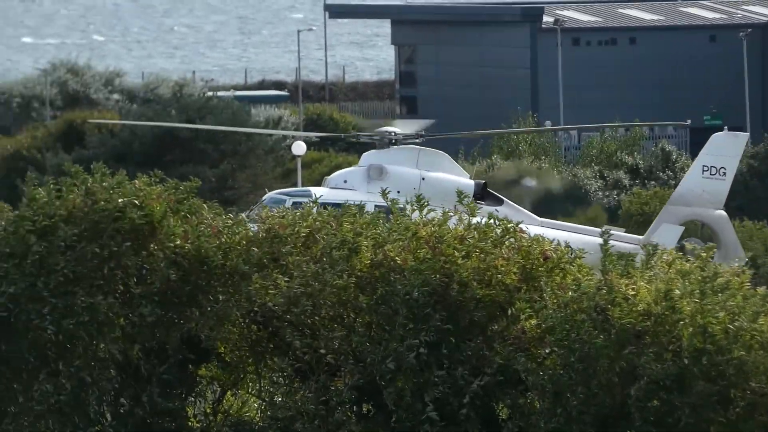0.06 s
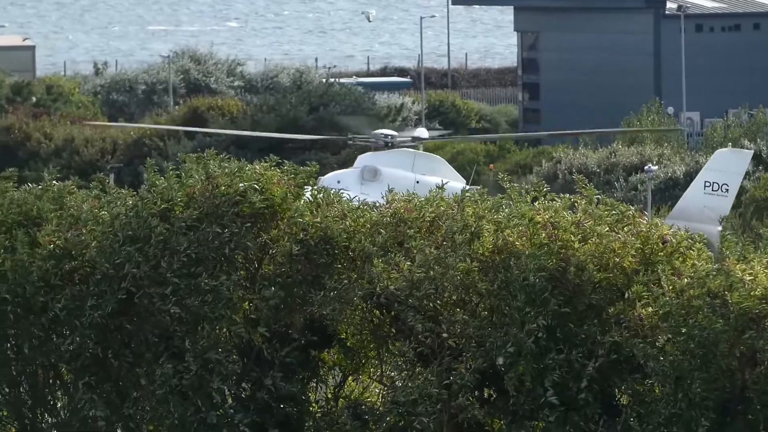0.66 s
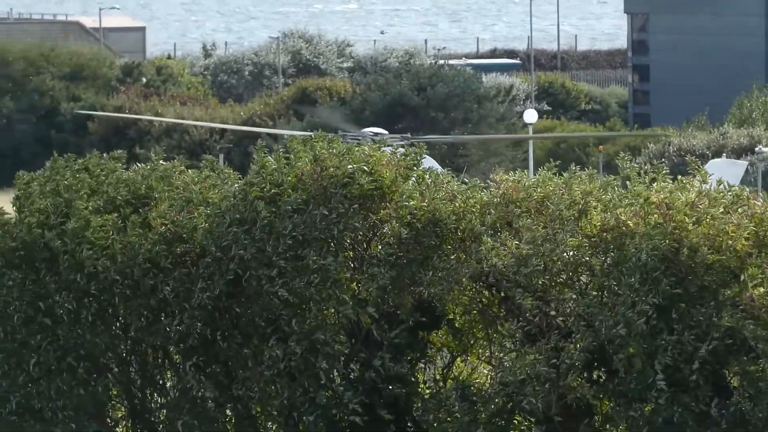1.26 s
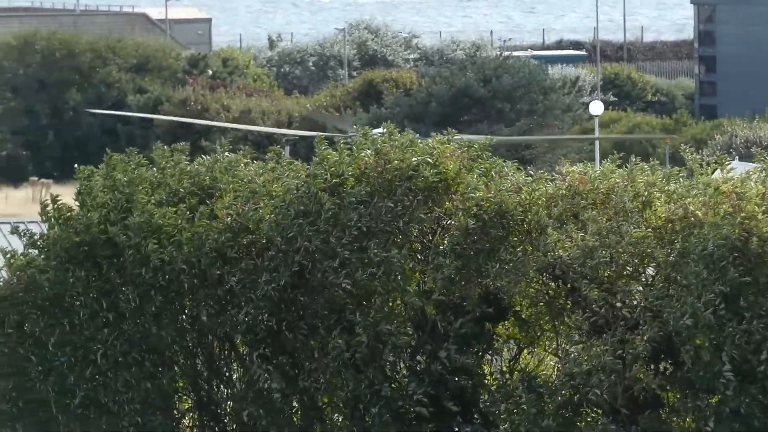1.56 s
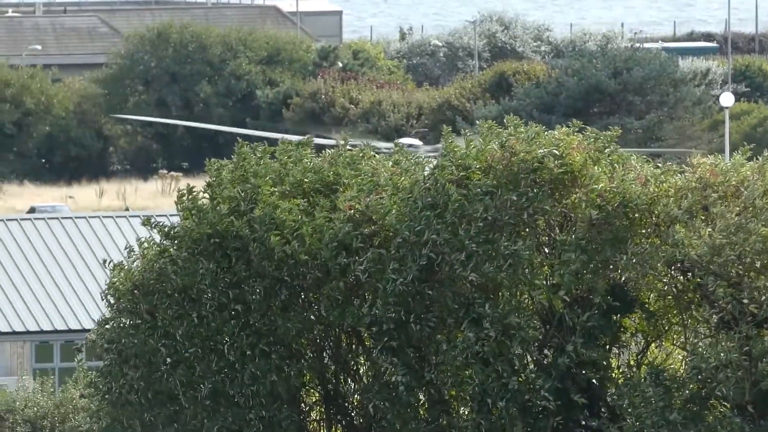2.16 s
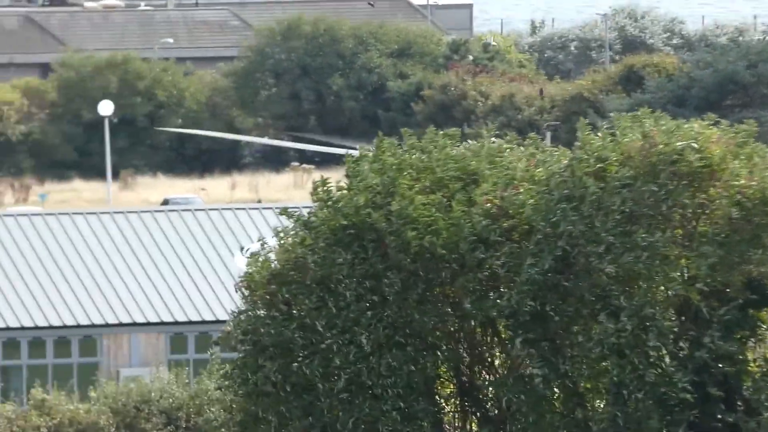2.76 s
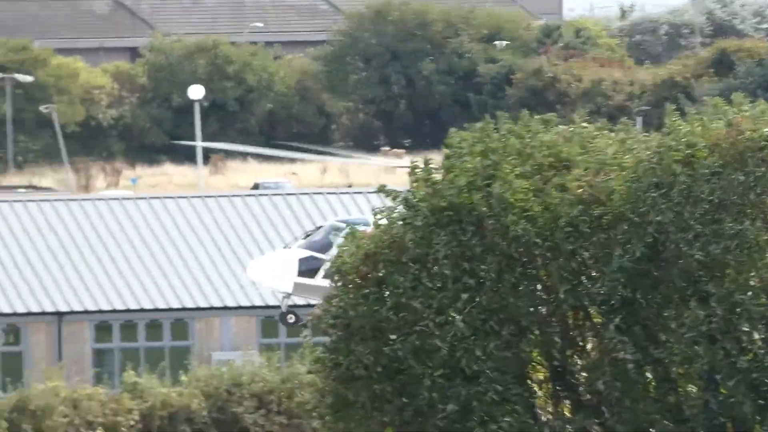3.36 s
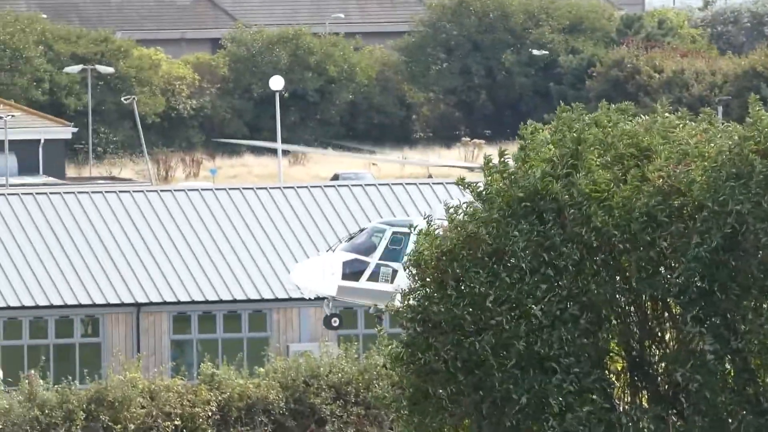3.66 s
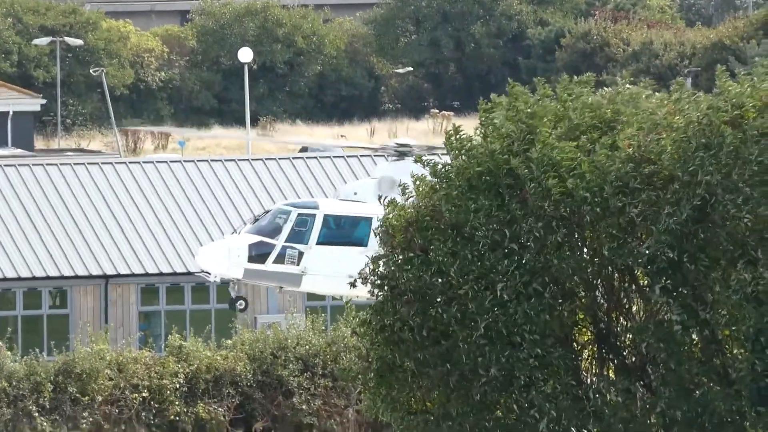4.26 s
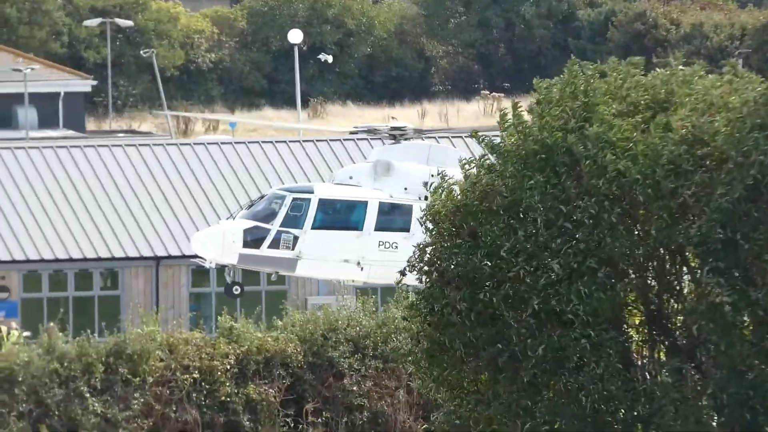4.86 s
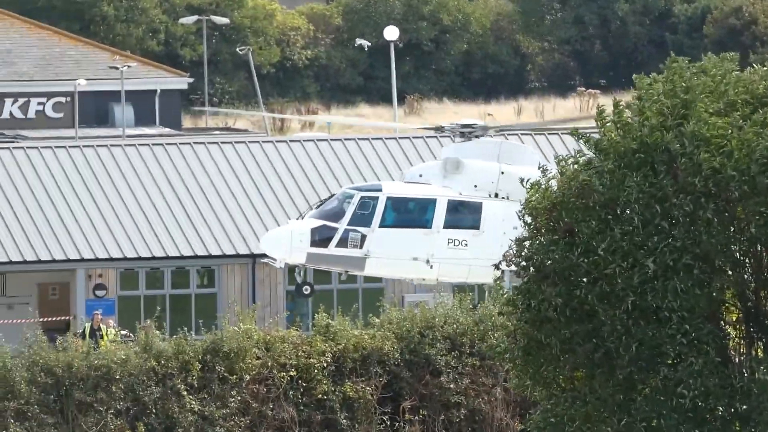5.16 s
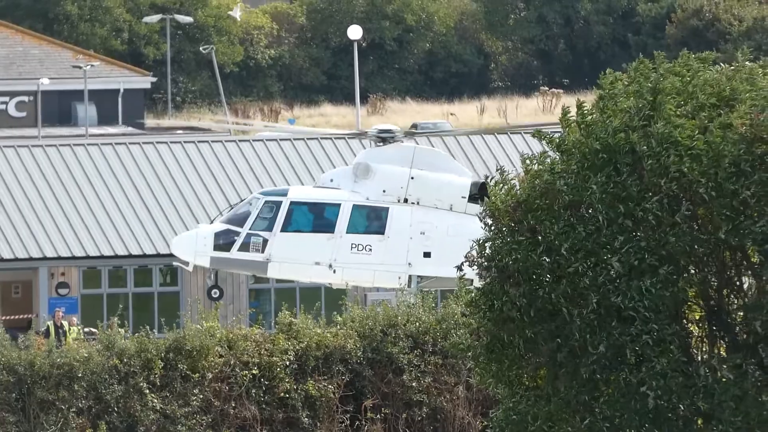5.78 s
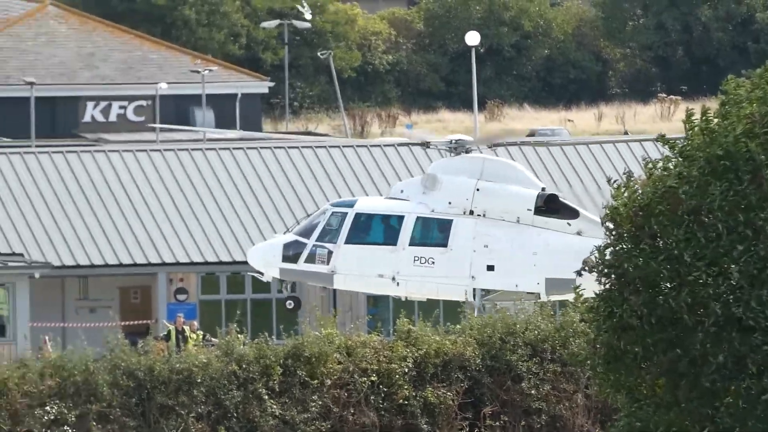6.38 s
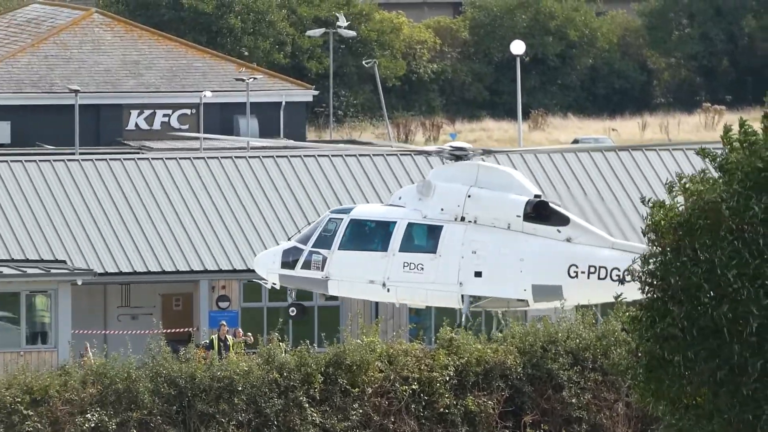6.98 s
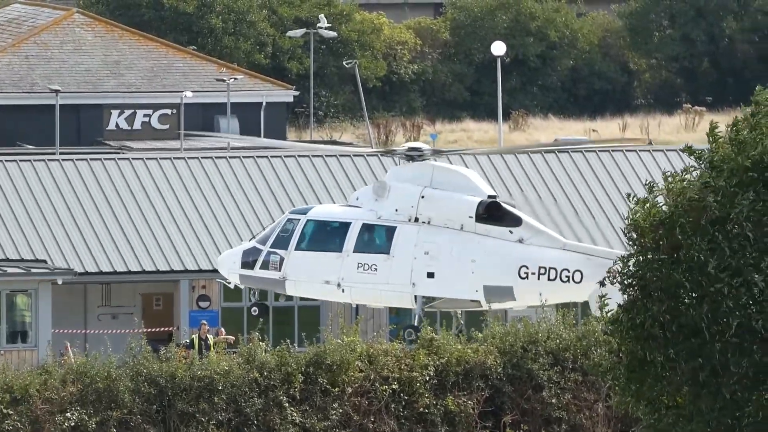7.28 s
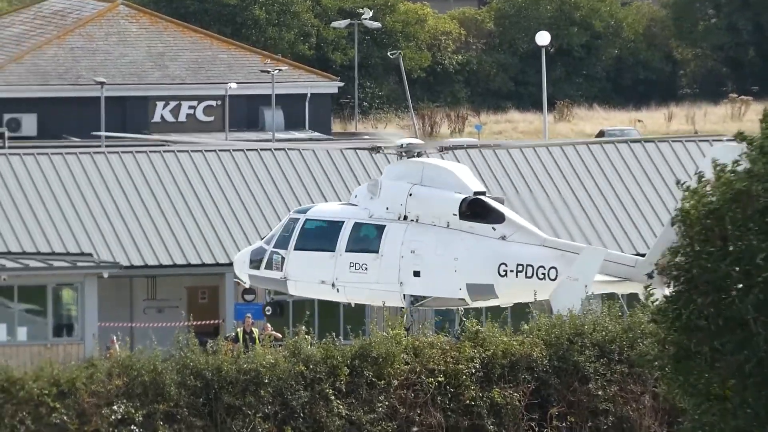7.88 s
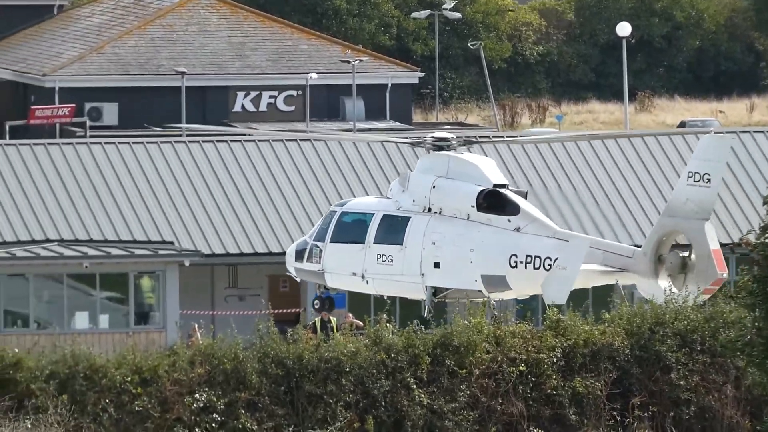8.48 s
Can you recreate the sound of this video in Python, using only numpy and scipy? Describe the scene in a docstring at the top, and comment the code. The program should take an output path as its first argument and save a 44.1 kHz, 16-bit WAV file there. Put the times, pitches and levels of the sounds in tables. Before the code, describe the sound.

A helicopter hovers low some way off outdoors, its rotor making a steady, throbbing rush with exhaust hiss and thin engine tones. Quick blade slaps build and are loudest in the first half, then the sound sinks to a softer hiss before swelling again with lighter slaps. Gusts flutter and thump on the microphone throughout, and a small bird whistles faintly early on.

```python
"""Helicopter behind a hedge

A twin-turbine helicopter hover-taxis some way off on a breezy day. Its rotor roar throbs at the blade
rate and sharpens into slaps where blades cut their own wake; tail fan, gearbox and turbines add thin
tones. Gusts buffet the microphone, leaves rustle and a small bird whistles over a distant rumble."""
import sys
import numpy as np
from scipy import signal
from scipy.fft import rfft, irfft, next_fast_len
from scipy.io import wavfile
from scipy.ndimage import map_coordinates

SR = 44100
rng = np.random.default_rng(int(sys.argv[2]) if len(sys.argv) > 2 else 0)


def wrap_up_sound(samples):
    """Save the sound to the file named by the first command line argument, as 16-bit audio."""
    columns = np.atleast_2d(samples).T
    # keep every value between -1 and 1, then stretch to whole-number steps
    tamed = np.clip(columns, -1, 1)
    steps = np.round(tamed * 32767).astype(np.int16)
    wavfile.write(sys.argv[1], SR, steps)


N = 376173
TIME = np.arange(N) / SR
FFT_SIZE = next_fast_len(N, real=True)
FREQS = np.maximum(np.arange(FFT_SIZE // 2 + 1) * SR / FFT_SIZE, 1)

# mix of blade rush, wake roar and exhaust hiss: time_s, rush_db, roar_over_rush_db, hiss_over_rush_db
ROTOR_MIX = [(0, -37, -0.5, -7), (.15, -33, 0.5, -7), (.3, -28, -7.5, -12.5), (.4, -37, -2.5, -12.5),
             (.53, -39, -7, -9), (.68, -32.5, 0, -11.5), (.8, -37.5, 2.5, -10), (1.38, -32, 5.5, -11.5),
             (1.55, -39.5, 4.5, -10), (1.74, -33.5, 3, -15), (1.87, -33.5, 4, -14), (2.0, -32.5, 7.5, -12),
             (2.32, -29.5, 3.5, -13.5), (2.62, -31, 5.5, -12), (2.8, -29, 6.5, -11.5),
             (2.94, -25.5, 1, -17), (3.26, -30.5, 0.5, -12), (3.48, -23, -2, -19), (3.65, -34.5, -4, -14),
             (3.82, -31.5, -10.5, -15.5), (4.18, -42, -2, -5), (4.48, -34, -1, -8), (4.75, -47.5, -12, -7),
             (4.88, -39, -7, -6.5), (5.03, -48.5, -8, -4.5), (5.36, -56.5, 5, -6.5),
             (5.78, -51, -8.5, -4.5), (5.95, -44.5, -7, -5.5), (6.27, -42, -1, -5), (6.4, -36.5, -2.5, -9),
             (6.52, -35.5, -7.5, -11.5), (6.93, -39, -5, -7.5), (7.16, -36, -3, -8),
             (7.68, -41.5, -2.5, -2.5), (7.9, -30, -8, -4.5), (8.02, -34, -4, -5.5),
             (8.26, -38.5, -7.5, -3.5), (8.42, -36.5, 0, -6), (8.53, -36, 1.5, -4)]
# rotor speed, rising a little as the pilot pulls up: time_s, blades_per_s
BLADE_RATE = [(0, 23.53), (4.55, 23.53), (6.0, 24.0), (8.53, 24.05)]
# how much of the rotor's power comes in pulses: time_s, share_0_to_1
CHOP = [(0, .08), (.55, .1), (.85, .42), (1.15, .42), (1.4, .28), (1.75, .05), (2.1, .2), (2.4, .3),
        (2.75, .25), (3.1, .08), (4.6, .05), (5.6, .08), (6.0, .22), (6.25, .1), (6.65, .04), (6.85, .24),
        (7.1, .22), (7.25, .05)]
# the ground swallows the roar below this edge: time_s, edge_hz
GROUND_EDGE = [(0, 686), (1.7, 797), (2.2, 734), (2.7, 460), (3.0, 487), (3.5, 630), (4.4, 634), (6.7, 820),
               (8.53, 637.4)]
# the rush brightens and dulls as the rotor tilts: time_s, centre_hz
RUSH_CENTRE = [(0, 1806), (.3, 1799), (1.4, 1645), (2.0, 1772), (3.5, 1674), (4.8, 1726), (6.0, 1624),
               (7.3, 1540), (7.75, 1682), (7.9, 1903), (8.05, 1684), (8.53, 1650)]
# the hiss turns hollow as the helicopter clears the hedge: time_s, depth_0_to_1
HOLLOW_DEPTH = [(4.8, 0), (5.5, 0.5), (7.3, 0.7), (8.53, 0.26)]
# blade slaps, before ground and air filter them: start_s, level_db, centre_hz, rise_s
SLAPS = [(.707, -21, 1400, .0009), (.792, -23, 1050, .0012), (.916, -21, 950, .0009),
         (1.044, -18, 1020, .0012), (1.1295, -14.5, 1050, .0009), (1.173, -18, 1000, .001),
         (1.298, -17, 1000, .0009), (1.342, -18.5, 880, .0008), (1.350, -14.5, 900, .0009),
         (1.425, -15.5, 950, .0009), (2.148, -14, 900, .0008), (2.194, -16, 1200, .001),
         (2.279, -12.5, 1300, .0013), (2.321, -11.5, 1100, .0013), (2.363, -13, 1500, .0011),
         (2.406, -8.5, 1400, .0012), (2.449, -9.5, 980, .0009), (2.4895, -3.5, 920, .0007),
         (2.5325, -5, 950, .0006), (2.790, -14, 900, .0009), (2.833, -13.5, 850, .0009),
         (2.876, -16, 900, .0009), (2.930, -14.5, 900, .0009), (2.960, -14, 1100, .0009),
         (3.170, -12.5, 940, .0006), (3.256, -12, 900, .0006), (3.558, -18, 1000, .0007),
         (4.891, -30, 1700, .0006), (5.131, -26, 1900, .0005), (5.9195, -26.5, 1550, .0007),
         (5.961, -28, 1550, .0006), (6.0025, -26, 1650, .0006), (6.044, -24.5, 1650, .0006),
         (6.087, -29, 1600, .0004), (6.128, -31, 1550, .0007), (6.212, -29.5, 1300, .0009),
         (6.257, -29.5, 1200, .0007), (6.379, -24.5, 1300, .0005), (6.421, -27, 1050, .0006),
         (6.797, -24, 1600, .0004), (6.8375, -20.5, 1500, .0005), (6.879, -23.5, 1650, .0008),
         (6.960, -28, 1600, .0007), (7.001, -21.5, 1500, .0005), (7.0425, -20.5, 1500, .0004),
         (7.053, -24.5, 1600, .0006), (7.083, -20.5, 1700, .0004), (7.283, -26, 950, .0014),
         (7.323, -25, 950, .0014), (7.361, -22.5, 850, .0012)]
# tail fan tone: time_s, level_db
FAN_LEVEL = [(0, -47), (1.0, -58), (1.7, -58), (2.7, -45), (3.6, -59), (4.8, -59), (5.7, -89), (7.7, -50.5),
             (7.95, -37), (8.22, -47), (8.53, -38)]
# gearbox tones: time_s, low_mesh_db, high_mesh_db
GEAR_LEVELS = [(0, -54, -57), (1.3, -60.5, -56), (2.1, -55.5, -52), (2.7, -35, -46), (3.2, -45, -47),
               (3.7, -70, -52), (5.0, -84, -67), (7.0, -59, -55), (7.6, -56, -52), (7.93, -45.5, -36.5),
               (8.23, -60, -50), (8.53, -51, -38)]
# rough engine hum: time_s, level_db
HUM_LEVEL = [(0, -33), (.3, -47), (.6, -63), (1.3, -37), (1.7, -46.5), (2.1, -33), (2.75, -31), (3.2, -37),
             (3.7, -45), (4.8, -63)]
# compressor whine, second turbine tone and an airy engine band that fades: time_s, pitch_hz, level_db
WHINE = [(0, 10375, -94), (1.0, 10400, -82), (2.2, 10340, -89), (2.9, 10410, -77), (3.7, 10430, -83),
         (4.4, 10670, -79), (5.0, 10720, -84), (5.4, 10660, -93), (6.5, 10630, -83), (7.4, 10530, -82),
         (8.53, 10480, -78)]
WHISTLE = [(0, 8700, -92), (1.0, 8800, -76), (2.8, 8740, -78.5), (3.6, 8850, -79), (5.0, 8800, -101),
           (8.53, 8748, -81)]
SOUGH = [(0, 2246, -41), (.3, 2260, -48), (.6, 2260, -55), (1.2, 2315, -68)]
# gusts on the microphone: start_s, length_s, flutter_db, rumble_over_flutter_db, left_over_right_db
GUSTS = [(0, 0.29, -46, -8, 5.5), (0.283, 0.34, -43.5, -12.5, 2.5), (0.725, 0.09, -40, -16.0, -1.0),
         (0.82, 0.11, -46.5, -9, -1), (0.923, 0.11, -42.0, -6.5, -1.5), (1.06, 0.14, -48.5, -7, 4),
         (1.376, 0.06, -50, -8, 3), (1.451, 0.066, -48, 4, 3), (1.55, 0.081, -49, -5.5, 3),
         (1.68, 0.48, -54.5, -6.5, 4), (2.385, 0.34, -56.5, 0.5, 2), (2.767, 0.2, -49.5, -4, 0.0),
         (2.962, 0.07, -47.5, -2, 1.0), (3.056, 0.12, -49.5, -1, 4), (3.194, 0.058, -44.5, -2, -2),
         (3.28, 0.13, -45.5, -3.5, -3), (3.458, 0.17, -46.5, 3, 4), (3.623, 0.19, -47, -6.5, 4),
         (3.848, 0.14, -44, -8.5, 5), (4.027, 0.061, -39.5, -27.0, -6), (4.126, 0.034, -40.5, -21.0, -6),
         (4.334, 0.18, -48.5, -1, 4), (4.54, 0.11, -46.5, -4, 7), (4.695, 0.058, -45.5, -7, 8),
         (4.965, 0.16, -41.5, -10.5, 7), (5.154, 0.21, -41, -13, 4.5), (5.367, 0.29, -42.5, -12.5, -0.5),
         (5.668, 0.11, -41.5, -7.0, -4), (5.786, 0.28, -49, -1.5, -0.5), (6.05, 0.22, -47.5, -4.5, -1),
         (6.354, 0.21, -51, -1, 6), (6.592, 0.2, -46.5, -6, 5.5), (6.834, 0.12, -43, -15, 4.0),
         (7.098, 0.033, -45.0, -14, -1.5), (7.177, 0.11, -44.5, -6, 1), (7.33, 0.325, -40, -18, 2.0),
         (7.674, 0.06, -51, -11.5, 2.5), (7.777, 0.11, -41.5, -15, 1.5), (7.912, 0.083, -42.5, -6, 5),
         (8.039, 0.23, -42, -13, 3), (8.29, 0.13, -46.5, -12, 2), (8.474, 0.06, -49, -2, 1.5)]
# how much the two microphone ports differ in wind: frequency_hz, side_over_mid_db
WIND_WIDTH = [(50, -20), (170, -22), (300, -12.5), (500, -7.5), (800, -2), (2000, 16.5)]
# single eddies on the microphone: start_s, level_db, centre_hz, rise_s, left_over_right_db
THUMPS = [(.722, -29.5, 380, .009, -1), (2.98, -31, 300, .004, 5), (3.173, -31, 380, .004, 0),
          (4.62, -33, 380, .004, 5), (4.672, -26.5, 520, .005, 5), (4.956, -29, 420, .004, 6),
          (5.325, -30, 400, .003, 3), (5.627, -30, 400, .002, -2), (6.733, -33, 370, .003, 3),
          (8.092, -32, 380, .003, 3), (8.25, -27.5, 400, .003, 4)]
# leaves shaken close by: centre_s, half_length_s, level_db
RUSTLES = [(1.842, .05, -67), (2.852, 0.25, -71.5), (3.241, 0.1, -68), (3.44, 0.062, -63),
           (4.304, 0.33, -75), (6.143, .016, -64), (6.303, .012, -65)]
# a small bird's whistles: start_s, length_s, from_hz, to_hz, half_peak_db
BIRD_NOTES = [(1.47, .07, 3040, 3340, -51.5), (1.55, .14, 3870, 3970, -57), (1.98, .14, 3060, 3380, -50.5),
              (2.06, .09, 4200, 4420, -55)]
# tone colours of the rotor, wind, hedge and background noises: frequency_hz, relative_db
ROAR_EQ = [(300, -26.5), (480, -9), (620, -5), (760, 7), (870, 9.5), (1020, 5.5), (1180, -3.5), (1500, 3),
           (2500, -28)]
RUSH_EQ = [(500, -51), (850, -14.5), (1200, -6.5), (1400, -2), (1700, 1.5), (1950, -2), (2150, -3),
           (2450, -8.5), (2800, -13.5), (3500, -24), (5000, -47.5)]
HISS_EQ = [(1800, -4), (2600, 1.5), (3100, 0), (4250, -2.5), (4750, -8), (5200, -9), (6000, -15),
           (7400, -22.5), (7950, -31), (8800, -28.5), (10500, -36.5), (11300, -53.5), (15000, -59)]
FLUTTER_EQ = [(100, -43), (200, -16), (310, 1), (450, 4.5), (600, -1), (780, -3.5), (1100, -15),
              (1800, -38.5), (3000, -62), (6000, -66.5)]
RUMBLE_EQ = [(30, -37.5), (55, -38), (78, -29.5), (100, -14.5), (140, -3), (200, 2.5), (260, 2), (360, -8),
             (600, -36.5)]
LEAVES_EQ = [(500, -28), (2500, 3.5), (4000, -8), (6000, -3), (8000, -16), (10500, -11.5), (11500, -23),
             (15000, -25.5)]
RUSTLE_EQ = [(4000, -21), (9500, 6), (11500, -2), (15000, -16)]
SURROUNDINGS_EQ = [(20, -20), (45, -25), (70, -14), (110, -3), (160, -1.5), (400, -1), (1000, -14)]


def rotor(hiss_chop=.43, grit_db=1.05, shimmer_db=1.5):
    """Wake roar, blade rush and exhaust hiss, throbbing with the blades."""
    rush_db, roar_db, hiss_db = automation(ROTOR_MIX)
    chop, = automation(CHOP)
    throb = np.sqrt(1 - chop + chop * blade_pulses())
    throb *= unit_rms(from_db(grit_db * drift(100)))  # eddies cut by the blades crackle
    blades = throb * (from_db(roar_db) * wake_roar() + blade_rush())
    exhaust = from_db(hiss_db) * exhaust_hiss() * (1 + hiss_chop * (throb - 1))
    mix = from_db(rush_db) * (blades + exhaust)
    # turbulent air on the way makes each band shimmer on its own
    return moving_eq(mix, 600, 8000, lambda hz: shimmer_db * drift(5), bands=10)


def blade_pulses(sharpness=3.0, uneven_db=.8, jitter=.015, first_blade_s=.027):
    """One swell of power per passing blade, each with its own strength; mean 1."""
    rate, = automation(BLADE_RATE)
    passed = np.cumsum(rate) / SR - first_blade_s * rate[0] + jitter * drift(19)
    blade = np.floor(passed + .5).astype(int)
    strength = from_db(uneven_db * rng.standard_normal(blade.max() + 2))[blade + 1]
    power = strength * np.exp(sharpness * np.cos(2 * np.pi * passed))
    return power / power.mean()


def wake_roar(db_per_octave=30):
    """The body of the rotor noise, its low end swallowed by the ground."""
    edge_hz, = automation(GROUND_EDGE)
    roar = unit_rms(noise(eq_curve(ROAR_EQ)))
    return moving_eq(roar, 330, 719, lambda hz: -db_per_octave * np.log2(edge_hz / hz).clip(0), bands=6)


def blade_rush(rest_hz=1700):
    """Air rushing over the blades; its whole colour slides as the rotor tilts."""
    centre_hz, = automation(RUSH_CENTRE)
    playhead = np.cumsum(centre_hz / rest_hz) % (N - 1)
    return unit_rms(map_coordinates(noise(eq_curve(RUSH_EQ)), [playhead], order=3))


def exhaust_hiss(notch_hz=4720, width_hz=230):
    """Bright exhaust noise, hollowed by a narrow notch of changing depth."""
    hiss = unit_rms(noise(eq_curve(HISS_EQ)))
    band = signal.lfilter(*signal.iirpeak(notch_hz, notch_hz / width_hz, fs=SR), hiss)
    depth, = automation(HOLLOW_DEPTH)
    return hiss - depth * band


def blade_slaps(echo_s=.01, echo_db=-13):
    """A blade hits a tip vortex and gives a crack of a few cycles; a wall returns it."""
    cracks = sum(burst(*slap, octaves=1.7, ring=1, crest_db=5.3) for slap in SLAPS)
    # the ground takes the bass away and the air the top
    distance = signal.butter(4, [580, 2400], "band", fs=SR, output="sos")
    cracks = signal.sosfilt(distance, cracks + 1e-18)
    return cracks + from_db(echo_db) * delayed(cracks, echo_s)


def drive_train(fan_cycles_per_blade=31.48, low_mesh_ratio=5 / 6, high_mesh_ratio=7 / 6):
    """Tail fan and gear meshes are geared to the rotor, so their pitches follow its speed."""
    fan_hz = fan_cycles_per_blade * automation(BLADE_RATE)[0]
    fan_db, = automation(FAN_LEVEL)
    low_db, high_db = automation(GEAR_LEVELS)
    fan = machine_tone(fan_hz, fan_db, waver=.008, waver_hz=25)
    overtone = machine_tone(2 * fan_hz, fan_db - 6, waver=.005, waver_hz=15)
    low_mesh = machine_tone(low_mesh_ratio * fan_hz, low_db, waver=.004, waver_hz=15, flicker_db=3.0)
    high_mesh = machine_tone(high_mesh_ratio * fan_hz, high_db, waver=.006, waver_hz=25)
    return fan + overtone + low_mesh + high_mesh


def machine_tone(hz, db, waver, waver_hz, flicker_db=3.5):
    """A sine whose pitch and strength waver in the moving air."""
    phase = 2 * np.pi * np.cumsum(hz * (1 + waver * drift(waver_hz))) / SR
    return from_db(db) * unit_rms(np.sin(phase) * from_db(flicker_db * drift(25)))


def engines(hum_hz=890):
    """A rough hum under the thin, high tones of the free-running turbines."""
    hum = machine_tone(hum_hz, automation(HUM_LEVEL)[0], waver=.011, waver_hz=30)
    whine = turbine_tone(*automation(WHINE), width_hz=80)
    whistle = turbine_tone(*automation(WHISTLE), width_hz=190)
    sough = turbine_tone(*automation(SOUGH), width_hz=90)
    return hum + whine + whistle + sough


def turbine_tone(hz, db, width_hz, waver=.003, flicker_db=1.8):
    """Turbulence smears a tone into a narrow, airy band that wavers slightly."""
    phase = 2 * np.pi * np.cumsum(hz * (1 + waver * drift(5))) / SR
    band = drift(width_hz) * np.cos(phase) + drift(width_hz) * np.sin(phase)
    return from_db(db) * unit_rms(band * from_db(flicker_db * drift(8)))


def wind(breeze_flutter_db=-55, breeze_rumble_db=-63, attack_s=.01, release_s=.022):
    """Gusts flutter and rumble on the microphone over a light breeze; each rises, holds and dies away."""
    flutter_power, rumble_power = from_db(breeze_flutter_db) ** 2, from_db(breeze_rumble_db) ** 2
    for start_s, length_s, flutter_db, rumble_db, left_db in GUSTS:
        attack = np.clip((TIME - start_s) / attack_s + .5, 0, 1)
        release = np.exp(-np.clip((TIME - start_s - length_s) / release_s, 0, 20))
        gust = from_db(flutter_db) * attack * release
        flutter_power = flutter_power + (gust * pan(left_db)) ** 2
        rumble_power = rumble_power + (gust * from_db(rumble_db)) ** 2
    flutter = np.sqrt(flutter_power) * buffet(FLUTTER_EQ, lump_db=2.5, lump_hz=43)
    rumble = np.sqrt(rumble_power) * buffet(RUMBLE_EQ, lump_db=3.0, lump_hz=17)
    return flutter + rumble


def buffet(eq, lump_db, lump_hz):
    """Lumpy eddy noise, partly different at the two microphone ports."""
    mid, side = noise(eq_curve(eq)), noise(eq_curve(eq) * eq_curve(WIND_WIDTH))
    lumps = unit_rms(from_db(lump_db * drift(lump_hz)))
    return lumps * (mid + side * [[1], [-1]]) / mid.std()


def thumps():
    """Single strong eddies thump on the microphone, most hitting one port harder."""
    return sum(burst(*thump, octaves=1.6, ring=0, crest_db=7) * pan(left_db)
               for *thump, left_db in THUMPS)


def hedge(level_db=-67, stir_db=1.5, crackle_db=2.5):
    """Leaves hiss faintly on both sides and rustle when shaken."""
    hiss = from_db(level_db + stir_db * drift(2)) * wide_noise(LEAVES_EQ, side_db=-3)
    shake = sum(from_db(db) * np.exp(-((TIME - at_s) / half_s) ** 2) for at_s, half_s, db in RUSTLES)
    return hiss + shake * wide_noise(RUSTLE_EQ, side_db=-6) * from_db(crackle_db * drift(120))


def bird():
    """A small bird whistles, each note a pure upward glide."""
    out = np.zeros(N)
    for start_s, length_s, from_hz, to_hz, db in BIRD_NOTES:
        progress = np.clip((TIME - start_s) / length_s, 0, 1)
        phase = 2 * np.pi * np.cumsum(from_hz + (to_hz - from_hz) * progress) / SR
        out += 2 * from_db(db) * np.sin(np.pi * progress) * np.sin(phase)
    return out


def surroundings(level_db=-69):
    """A wide bed of distant outdoor rumble."""
    return from_db(level_db) * wide_noise(SURROUNDINGS_EQ, side_db=.5)


def burst(start_s, db, hz, rise_s, octaves, ring, crest_db):
    """A short, rough hit that peaks near db; ring adds a pitched core."""
    out, age = np.zeros(N), TIME[:SR // 8]
    envelope = (age / rise_s) * np.exp(-age / rise_s / 2)
    band = signal.butter(2, hz * 2 ** (octaves * np.array([-.5, .5])), "band", fs=SR, output="sos")
    grit = unit_rms(signal.sosfilt(band, rng.standard_normal(len(age))))
    core = ring * np.sin(2 * np.pi * (hz * age + rng.random()))
    hit = signal.sosfilt(band, envelope * np.tanh(grit + core))
    hit = unit_rms(hit) / unit_rms(envelope).max()
    start = round(start_s * SR)
    out[start:start + len(age)] = from_db(db - crest_db) * hit[:N - start]
    return out


def noise(gains):
    """Noise of the given colour."""
    return irfft(rfft(rng.standard_normal(FFT_SIZE)) * gains)[:N]


def wide_noise(eq, side_db):
    """Noise from all around, partly alike left and right; unit power."""
    mid, side = noise(eq_curve(eq)), noise(eq_curve(eq))
    return unit_rms(mid + from_db(side_db) * side * [[1], [-1]])


def eq_curve(points):
    """Gain at every frequency, falling 40 dB in the octave past each end."""
    hz, db = np.transpose(points)
    hz, db = [hz[0] / 2, *hz, hz[-1] * 2], [db[0] - 40, *db, db[-1] - 40]
    return from_db(np.interp(np.log(FREQS), np.log(hz), db))


def moving_eq(x, low_hz, high_hz, gain_db, bands):
    """Split into overlapping bands and ride each with the moving gain gain_db(hz)."""
    centres, spectrum = np.geomspace(low_hz, high_hz, bands), rfft(x, FFT_SIZE)
    shares = [np.interp(np.log(FREQS), np.log(centres), row) for row in np.eye(bands)]
    return sum(irfft(spectrum * share)[:N] * from_db(gain_db(hz)) for hz, share in zip(centres, shares))


def drift(rate_hz, hop=40, settle=2000):
    """Smooth random modulation with spread 1, rolling off above rate_hz."""
    pole = np.exp(-2 * np.pi * rate_hz * hop / SR)
    white = rng.standard_normal(N // hop + settle + 2)
    slow = signal.lfilter([1], [1, -2 * pole, pole * pole], white)[settle:]
    return np.interp(np.arange(N) / hop, np.arange(len(slow)), unit_rms(slow))


def automation(rows):
    """One value per sample for each column after the time."""
    times, *columns = np.transpose(rows)
    return [np.interp(TIME, times, column) for column in columns]


def delayed(x, seconds):
    """The same sound after a longer path."""
    return np.interp(TIME - seconds, TIME, x, left=0)


def pan(left_db):
    """Left and right gains, left_db apart."""
    return from_db([[left_db / 2], [-left_db / 2]])


def from_db(db):
    """Decibels to gain."""
    return 10 ** (np.asarray(db) / 20)


def unit_rms(x):
    """Scale to unit power."""
    return x / np.sqrt(np.mean(x ** 2) + 1e-20)


def scene(scatter_db=-15, scatter_hz=4000, scatter_s=.047):
    """The helicopter is straight ahead; some of its treble is scattered back from the sides."""
    helicopter = rotor() + blade_slaps() + drive_train() + engines()
    treble = signal.sosfilt(signal.butter(2, scatter_hz, "high", fs=SR, output="sos"), helicopter)
    scattered = from_db(scatter_db) * delayed(treble, scatter_s) * [[1], [-1]]
    return helicopter + scattered + surroundings() + wind() + thumps() + hedge() + bird()


def record(dry, cutoff_hz=15200):
    """A steep high cut takes off the very top."""
    return signal.sosfilt(signal.ellip(10, .1, 80, cutoff_hz, fs=SR, output="sos"), dry)


dry = scene()
out = record(dry)
wrap_up_sound(out)
```